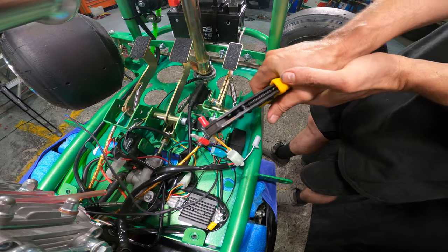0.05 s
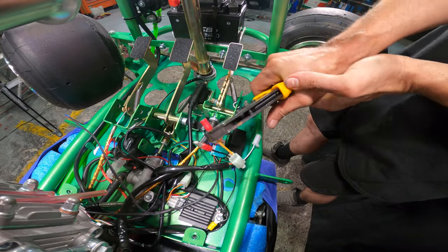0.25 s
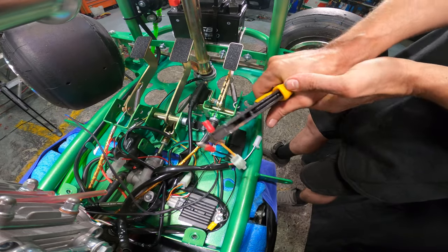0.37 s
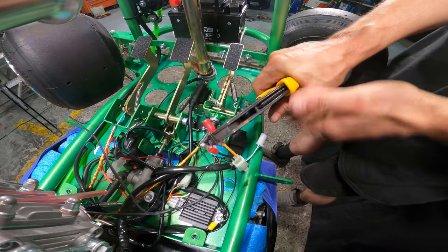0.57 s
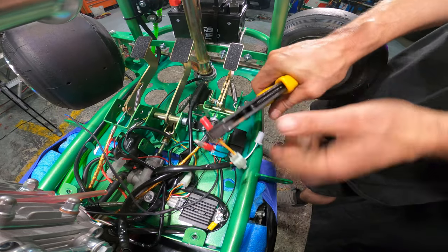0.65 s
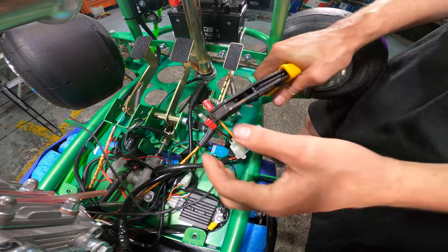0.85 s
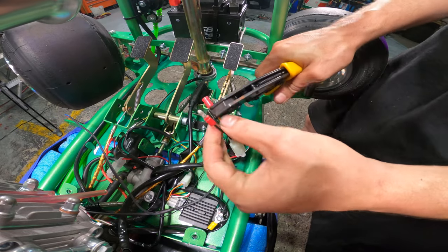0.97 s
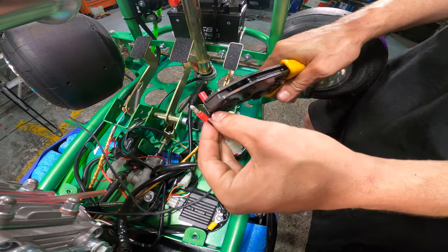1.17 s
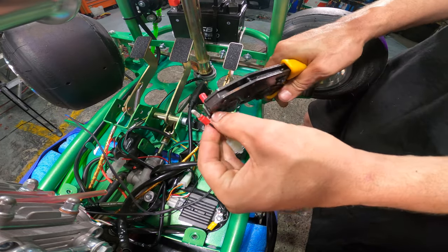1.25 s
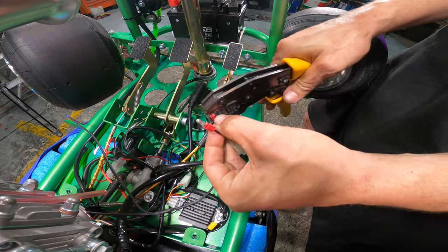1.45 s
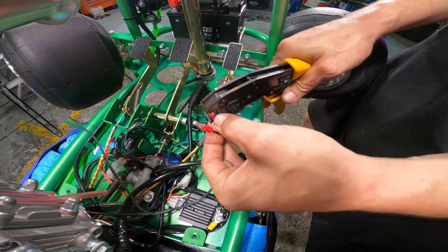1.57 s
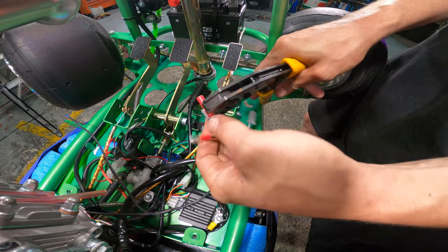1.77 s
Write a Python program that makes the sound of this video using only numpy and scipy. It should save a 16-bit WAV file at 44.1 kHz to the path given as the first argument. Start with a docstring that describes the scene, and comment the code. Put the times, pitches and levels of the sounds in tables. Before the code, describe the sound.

A ratcheting crimping tool clicks three times in the first 0.2 seconds, then releases with a loud snap that leaves the steel briefly ringing. Light metal clinks and soft hand rubs follow from 0.5 to 1.2 seconds. The jaws then open in quick ticks and clack against their stop at about 1.4 seconds. The tool is close, in a quiet workshop with faint ventilation and electrical hum.

```python
"""A ratcheting crimping tool is squeezed shut on a wire terminal in a quiet workshop. The pawl clicks over
three teeth and lets go with a loud snap that leaves the steel ringing. The loose tool clinks; then the jaws
open in a run of ticks and clack against their stop. Hands bump the tool and cloth rubs as the arm moves;
ventilation and a faint mains hum lie underneath."""
import sys
import numpy as np
from scipy import signal
from scipy.fft import rfft, irfft
from scipy.io import wavfile
from scipy.ndimage import uniform_filter1d

SR = 44100
rng = np.random.default_rng(int(sys.argv[2]) if len(sys.argv) > 2 else 0)


def transcribe(u):
    """Save the signal u as a 16-bit wav file named by the first command-line argument.

    u: samples, shape (n,) or (channels, n), limited to [-1, 1]; the rate is SR.
    q: integer samples, one column per channel.
    """
    v = np.clip(np.atleast_2d(u).T, -1, 1)
    q = np.round(v * 32767).astype(np.int16)
    wavfile.write(sys.argv[1], SR, q)


N = 79380

# steel frame modes (frequency [Hz], level [dB], t60 [s])
FRAME_MODES = [(1068.6, -52.5, .7), (1073.3, -52.5, .7), (1380, -52, .35), (2134, -59, .6),
               (2440, -64, .45), (2490, -64, .4), (3025, -66, .35), (4043, -60, .3), (4678, -68, .4),
               (6584, -63, .35), (8888, -65, .4)]


def amp(db):
    """Decibels to gain."""
    return 10 ** (np.asarray(db) / 20)


def unit(x):
    """Scale to unit rms."""
    return x / np.sqrt(np.mean(x ** 2) + 1e-20)


def log_interp(points, hz):
    """Interpolate a table over log frequency."""
    point_hz, value = np.transpose(points)
    return np.interp(np.log(hz + 1), np.log(point_hz + 1), value)


def add(mix, start_s, sound):
    """Mix a sound in at start_s."""
    part = mix[max(round(start_s * SR), 0):][:len(sound)]
    part += sound[:len(part)]


def body_gain(body, hz, floor_db=-34, low_cut_hz=200):
    """Broad resonances summed in power over a weak floor, bass cut."""
    power = sum(amp(db) ** 2 / (1 + ((hz - f) / (.8 * width)) ** 2) ** 2 for f, width, db in body)
    floor = amp(max(db for _, _, db in body) + floor_db) / (1 + hz / 6000)
    return np.sqrt(power + floor ** 2) * hz / np.hypot(hz, low_cut_hz)


def minimum_phase(gain):
    """Minimum-phase spectrum of a gain curve."""
    log_gain = np.log(np.maximum(gain, 1e-5))
    mirrored = np.r_[log_gain, log_gain[-2:0:-1]]
    return np.exp(np.conj(signal.hilbert(mirrored)))[:len(gain)]


def chatter(contact, size):
    """Whitened spectrum of one blow and the dense micro-impacts after it."""
    blow, rise_s, fast_s, slow_s, slow_db = contact
    t = np.arange(size) / SR
    decay = np.exp(-t / fast_s) + amp(slow_db) * np.exp(-t / slow_s)
    force = rng.standard_normal(size) * (1 - np.exp(-t / rise_s)) * decay
    force /= np.linalg.norm(force)
    force[0] += blow
    spectrum = rfft(force)
    smooth_power = uniform_filter1d(uniform_filter1d(abs(spectrum) ** 2, size=40), size=40)
    return spectrum * minimum_phase(smooth_power ** -.5)


def click(body, contact, db=0, tilt_db_oct=0, pitch=1, size=4096):
    """Chattering contact filtered by hand-damped steel."""
    hz = np.fft.rfftfreq(size, 1 / SR)
    octaves = np.log2(np.maximum(hz, 1000) / 4000)
    gain = body_gain(body, hz / pitch) * amp(db + tilt_db_oct * octaves)
    return irfft(chatter(contact, size) * minimum_phase(gain))


def ring(modes, db=0, pitch=1):
    """Freely decaying modes of a struck part."""
    t = np.arange(SR) / SR
    return sum(amp(db + mode_db - 60 * t / t60_s) * np.sin(2 * np.pi * hz * pitch * t)
               for hz, mode_db, t60_s in modes)


def ventilation(rms_db=-64.3, flicker_db=1.0):
    """Air rumble and hiss, flickering slightly in patches."""
    # noise spectrum (frequency [Hz], relative density [dB])
    spectrum = [(10, -5), (45, -2.5), (75, -3.5), (115, 0), (170, -4), (260, -9.5), (400, -15), (650, -17),
                (1100, -19.7), (2200, -22), (4400, -24), (9000, -25), (15500, -25.7)]
    hz, _, noise = signal.stft(rng.standard_normal(N), SR, nperseg=2048)
    patches = uniform_filter1d(rng.standard_normal(noise.shape), size=30, axis=0)
    patches = unit(uniform_filter1d(patches, size=6, axis=1))
    gain = amp(log_interp(spectrum, hz)[:, None] + flicker_db * patches)
    air = signal.istft(noise * gain, SR, nperseg=2048)[1][:N]
    return amp(rms_db) * unit(air)


def mains_hum(waver_depth=.4):
    """Three low partials, each wavering in level."""
    # (frequency [Hz], level [dB])
    partials = [(49, -83), (97, -76), (146.5, -73)]
    out, t = np.zeros(N), np.arange(N) / SR
    for hz, db in partials:
        waver = unit(uniform_filter1d(uniform_filter1d(rng.standard_normal(N), size=4000), size=2000))
        out += amp(db) * (1 + waver_depth * waver) * np.sin(2 * np.pi * (hz * t + rng.random()))
    return out


def workshop_reverb(x, build_s=.008):
    """Diffuse tail: builds quickly, dies soonest in the high treble."""
    # (frequency [Hz], level [dB])
    colour = [(200, -20), (1000, -17.5), (2150, -12.5), (2850, -20), (4100, -14), (5300, -15), (6400, -17),
              (7900, -26), (9300, -17.5), (11000, -14.5), (15000, -17)]
    # (frequency [Hz], t60 [s])
    decay_times = [(200, .5), (2000, .62), (5000, .58), (9000, .5), (15000, .3)]
    hz, t, noise = signal.stft(rng.standard_normal(SR), SR, nperseg=256)
    decay_per_s = np.log(1000) / log_interp(decay_times, hz)[:, None]
    envelope = np.exp(-decay_per_s * t) * np.sqrt(2 * decay_per_s / SR)  # unit energy per band
    tail = signal.istft(noise * envelope * amp(log_interp(colour, hz))[:, None], SR, nperseg=256)[1]
    onset = 1 - np.exp(-np.arange(len(tail)) / SR / build_s)
    return signal.fftconvolve(x, tail * onset)[:N]


def early_echoes(x):
    """Band-limited reflections off the metal chassis and floor below."""
    # (delay [s], level [dB], centre [Hz], width [Hz])
    reflections = [(.0051, -8, 3600, 1800), (.0052, -12, 10000, 3000), (.0115, -17, 6500, 9000)]
    out, hz = np.zeros(N), np.fft.rfftfreq(N, 1 / SR)
    for delay_s, db, centre_hz, width_hz in reflections:
        gain = amp(db) / np.hypot(1, 2 * (hz - centre_hz) / width_hz)
        add(out, delay_s, irfft(rfft(x) * gain, N))
    return out


def hands():
    """Soft bumps on the tool and cloth rubbing as the arm moves."""
    # (centre time [s], level [dB], frequency [Hz], length [s])
    bumps = [(.066, -61, 120, .03), (.555, -61, 95, .05), (1.04, -63, 105, .04), (1.63, -64, 110, .04),
             (1.77, -62, 98, .08)]
    # (centre time [s], level [dB], length [s])
    rubs = [(.47, -75, .16), (.9, -72, .3)]
    # friction bands (centre [Hz], width [Hz], relative level [dB])
    rub_bands = [(800, 1200, 4), (2000, 2000, 0), (4200, 2500, -1), (8000, 5000, -5)]
    out = np.zeros(N)
    for centre_s, db, hz, length_s in bumps:
        t = np.arange(-length_s / 2, length_s / 2, 1 / SR)
        window = np.cos(np.pi * t / length_s) ** 2
        add(out, centre_s - length_s / 2, amp(db) * window * np.cos(2 * np.pi * hz * t))
    t, hz = np.arange(N) / SR, np.fft.rfftfreq(N, 1 / SR)
    hiss = unit(irfft(rfft(rng.standard_normal(N)) * body_gain(rub_bands, hz), N))
    swells = sum(amp(db) * np.exp(-(2 * (t - centre_s) / length_s) ** 2)
                 for centre_s, db, length_s in rubs)
    return out + hiss * swells


def loose_clinks():
    """Loose metal parts touch and ring briefly."""
    # (time [s], level [dB], ring pitch [ratio])
    touches = [(.541, -13, 1.4), (.7255, -.7, 1.005), (1.1365, -1.5, .99), (1.18, -9, .67)]
    # (frequency [Hz], level [dB], t60 [s])
    modes = [(1790, -63, .05), (2750, -62, .05), (3120, -59, .07), (4355, -55.5, .07), (4820, -68, .07),
             (5464, -70, .08), (6525, -66, .09), (7120, -64, .12), (7741, -68, .12), (8620, -69, .12)]
    # (centre [Hz], width [Hz], level [dB])
    body = [(3000, 1800, -27), (7400, 1400, -28), (10000, 4000, -35)]
    # (blow [ratio], rise [s], fast decay [s], slow decay [s], slow level [dB])
    contact = (.05, .0008, .005, .012, -10)
    out = np.zeros(N)
    for time_s, db, pitch in touches:
        add(out, time_s, ring(modes, db, pitch))
        add(out, time_s, click(body, contact, db))
    return out


def jaws_opening():
    """The jaws tick open and stutter into their stop; the last knock rings the spring."""
    # (time [s], level [dB], tilt [dB/oct], pitch [ratio])
    ticks = [(1.2417, -.4, 0, 1.01), (1.2682, -13, 1, 1), (1.2717, -1, -.5, .99), (1.3149, -7, -.3, 1.04),
             (1.3544, -3.5, -.7, 1.18)]
    # (time [s], level [dB], tilt [dB/oct])
    knocks = [(1.3673, -13.5, 0), (1.3761, -11.3, 2), (1.384, -11.5, 1.1), (1.393, 0, 0)]
    # (centre [Hz], width [Hz], level [dB])
    tick_body = [(500, 900, -25), (1660, 280, -13), (2940, 300, -14), (3650, 250, -13), (4450, 600, -21),
                 (5600, 500, -22), (6700, 700, -23), (8350, 700, -18), (9300, 600, -21), (12500, 5000, -35)]
    stop_body = [(600, 900, -17), (1680, 300, -4), (2000, 300, -3), (3500, 500, -3), (4400, 700, -9),
                 (6000, 1200, -14), (7350, 550, -7), (8600, 800, -13), (10200, 1200, -16),
                 (13300, 3500, -21)]
    # (frequency [Hz], level [dB], t60 [s])
    spring_modes = [(1071, -77, 1.0), (1857, -71, .35), (2030, -69, .25), (3284, -72, .4), (3500, -70, .3),
                    (5333, -83, 1.0), (5690, -73, .8)]
    # (blow [ratio], rise [s], fast decay [s], slow decay [s], slow level [dB])
    tick_contact, stop_contact = (.05, .0004, .0012, .004, -21), (.05, .0004, .0014, .007, -23)
    out = np.zeros(N)
    for time_s, db, tilt_db_oct, pitch in ticks:
        add(out, time_s, click(tick_body, tick_contact, db, tilt_db_oct, pitch))
    for time_s, db, tilt_db_oct in knocks:
        add(out, time_s, click(stop_body, stop_contact, db, tilt_db_oct))
    last_s, last_db, _ = knocks[-1]
    add(out, last_s, ring(spring_modes, last_db))
    return out


def pawl_clicks(frame_db=-21):
    """The pawl drops over each tooth, pings and faintly rings the frame."""
    # (time [s], level [dB], tilt [dB/oct], ping level [dB])
    teeth = [(.0044, 0, 0, -7), (.1008, -8.5, -1.3, -12), (.1962, -3.5, .7, 0)]
    # (frequency [Hz], level [dB], t60 [s])
    ping = [(2640, -35, .014)]
    # (centre [Hz], width [Hz], level [dB])
    body = [(1480, 250, -3), (2800, 350, -8.5), (3900, 500, -8.5), (5000, 250, -8), (5700, 300, -9.5),
            (6750, 400, -9), (7900, 700, -9.5), (9100, 600, -15), (10500, 700, -21), (13500, 3000, -30)]
    # (blow [ratio], rise [s], fast decay [s], slow decay [s], slow level [dB])
    contact = (.1, .0005, .0009, .004, -22)
    out = np.zeros(N)
    for time_s, db, tilt_db_oct, ping_db in teeth:
        add(out, time_s, ring(ping, ping_db))
        add(out, time_s, click(body, contact, db, tilt_db_oct))
        add(out, time_s, ring(FRAME_MODES, db + frame_db))
    return out


def ratchet_snap(snap_s=.2386):
    """The ratchet lets go and rings the frame; the handles then thud against their stop."""
    # (centre [Hz], width [Hz], level [dB])
    body = [(750, 350, -10), (1375, 150, 9.5), (1670, 150, 8), (2160, 130, 4), (2580, 380, 8.5),
            (3010, 150, 6), (3950, 550, 7), (4950, 300, 2.5), (5550, 150, 4), (6500, 330, 10),
            (7460, 220, 14), (8100, 600, 15), (8850, 200, 6), (9580, 450, 9.5), (11000, 1300, -1.5),
            (13800, 3000, -6)]
    # (blow [ratio], rise [s], fast decay [s], slow decay [s], slow level [dB])
    contact = (.08, .0013, .00075, .0038, -19.5)
    thud_s, thud_db, push_s, recoil = .2493, -32.7, .00044, .2
    out = np.zeros(N)
    add(out, snap_s, click(body, contact))
    add(out, snap_s, ring(FRAME_MODES))
    u = (np.arange(N) / SR - thud_s) / push_s
    thud = np.exp(-u ** 2) - recoil * np.exp(-(recoil * u) ** 2)  # short push, broad recoil
    return out + amp(thud_db) * thud


def scene():
    """The close tool with its echoes, reverb and background; mono."""
    closing_echo_db, opening_reverb_db = -7, -1.3
    closing = pawl_clicks() + ratchet_snap() + loose_clinks() + hands()
    opening = jaws_opening()
    echoes = early_echoes(amp(closing_echo_db) * closing + opening)
    reverb = workshop_reverb(closing + amp(opening_reverb_db) * opening)
    return (closing + opening + echoes + reverb + ventilation() + mains_hum())[None]


def record(dry):
    """Steep low-pass on the mix."""
    cutoff_hz = 15820
    taps = signal.firwin(511, cutoff_hz, window=("kaiser", 8), fs=SR)
    return signal.oaconvolve(dry, taps[None], "same")


dry = scene()
out = record(dry)
transcribe(out)
```